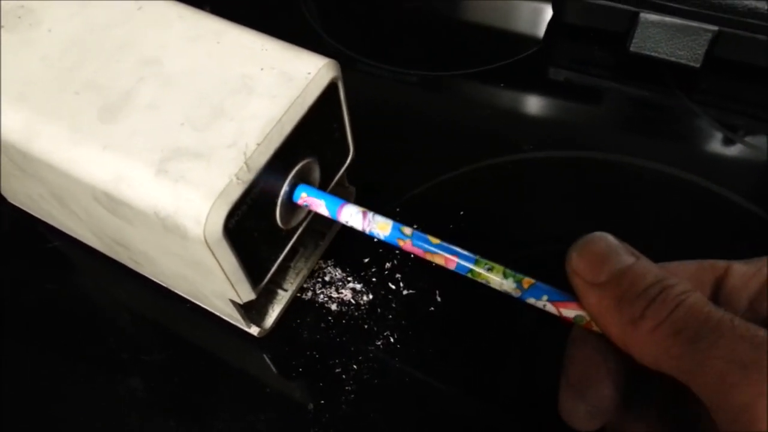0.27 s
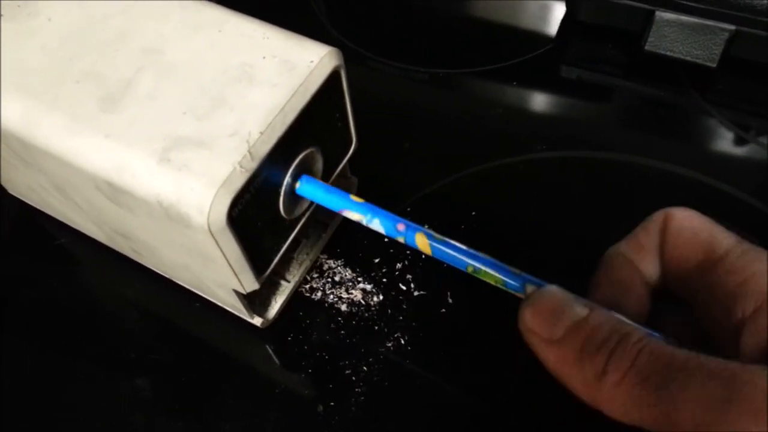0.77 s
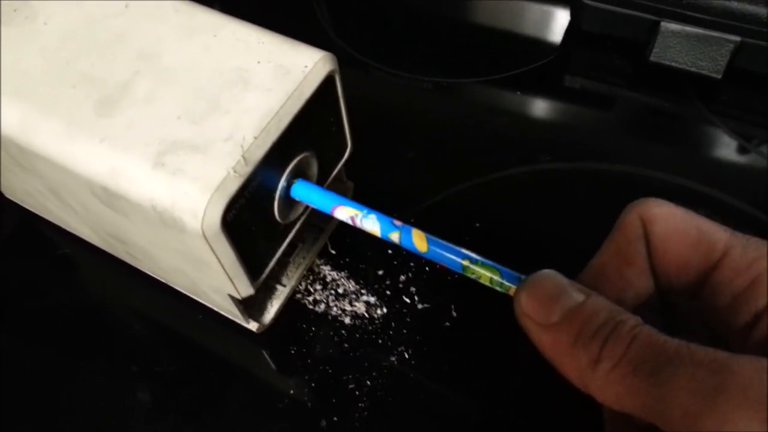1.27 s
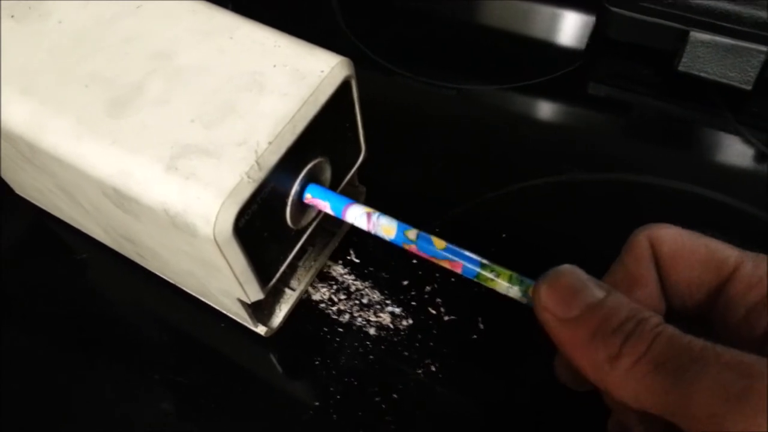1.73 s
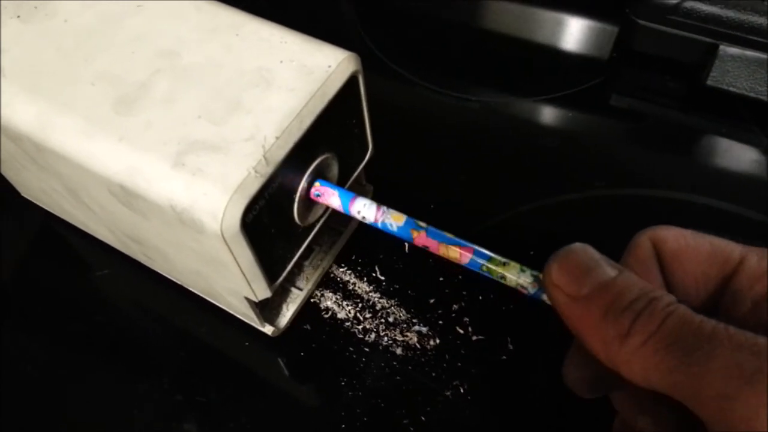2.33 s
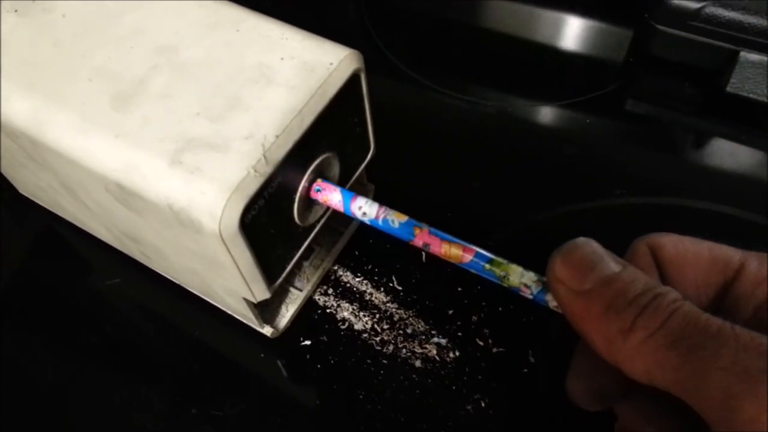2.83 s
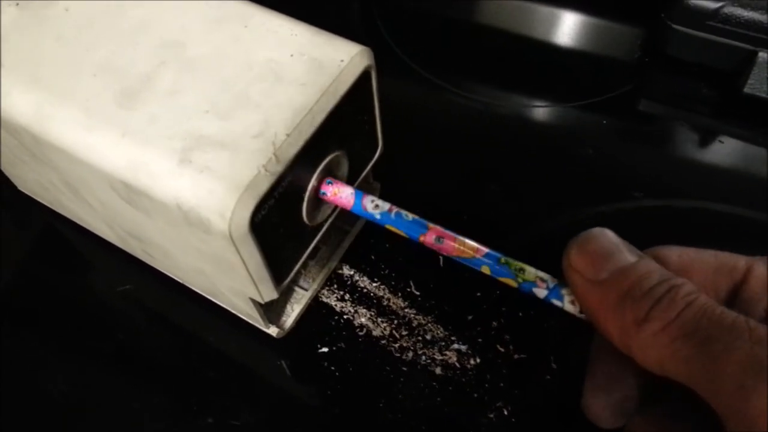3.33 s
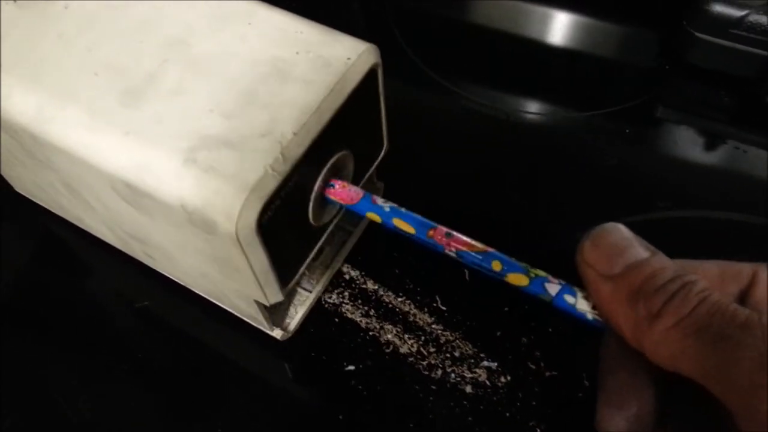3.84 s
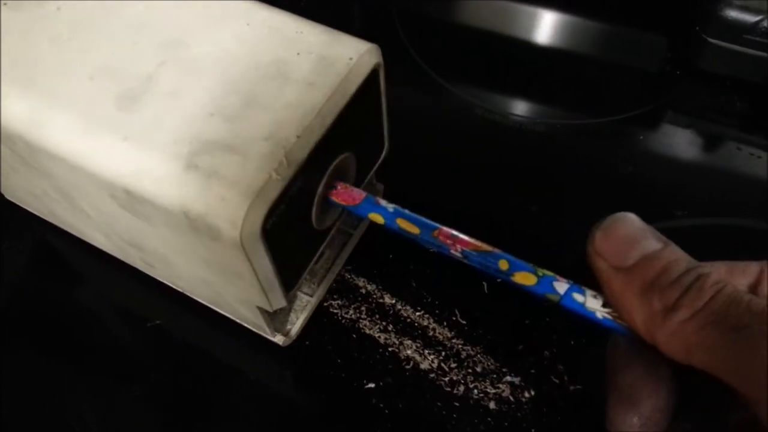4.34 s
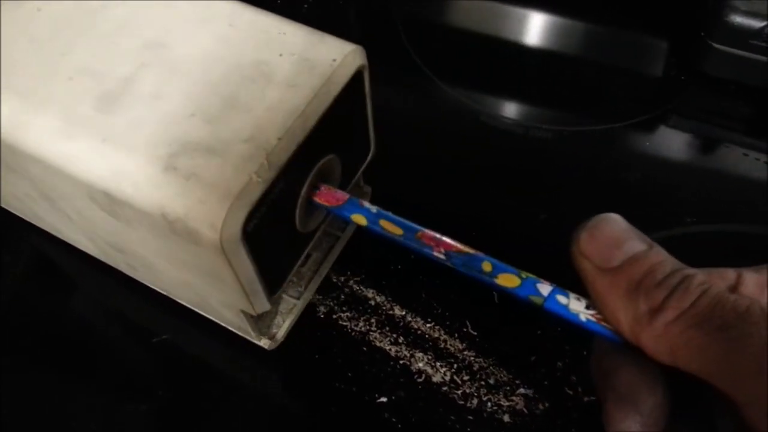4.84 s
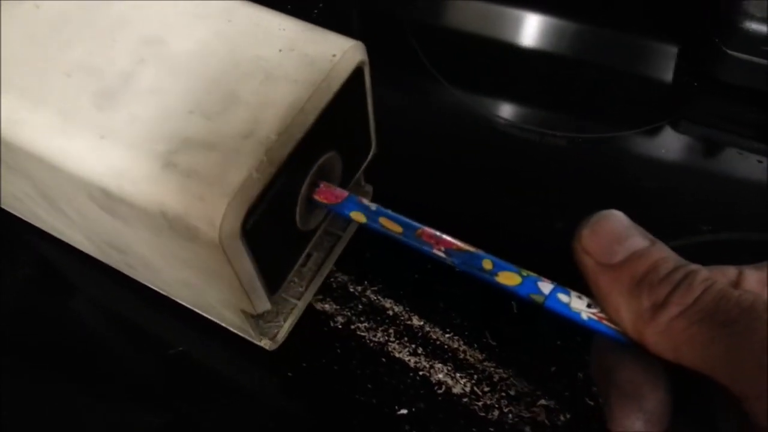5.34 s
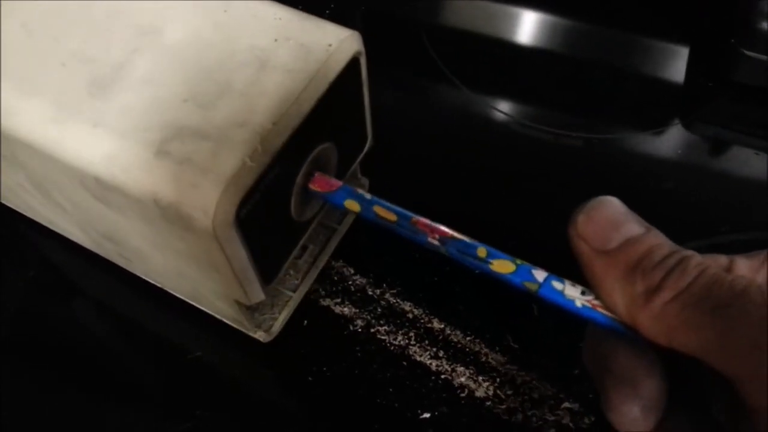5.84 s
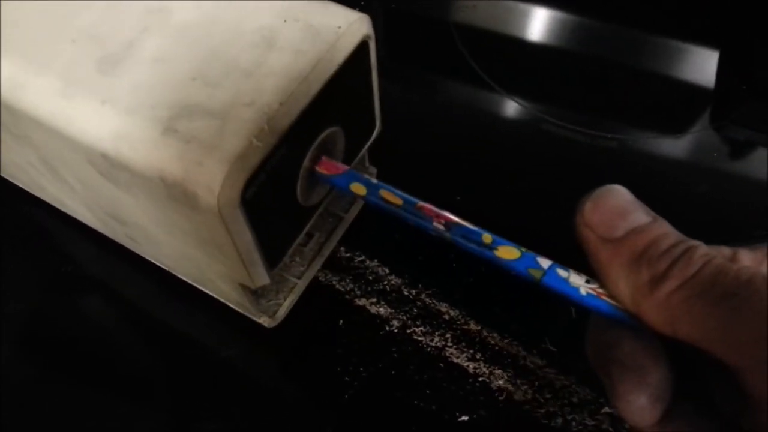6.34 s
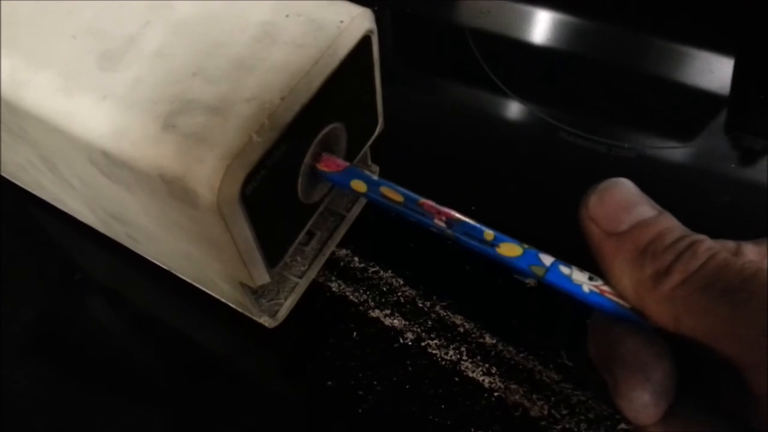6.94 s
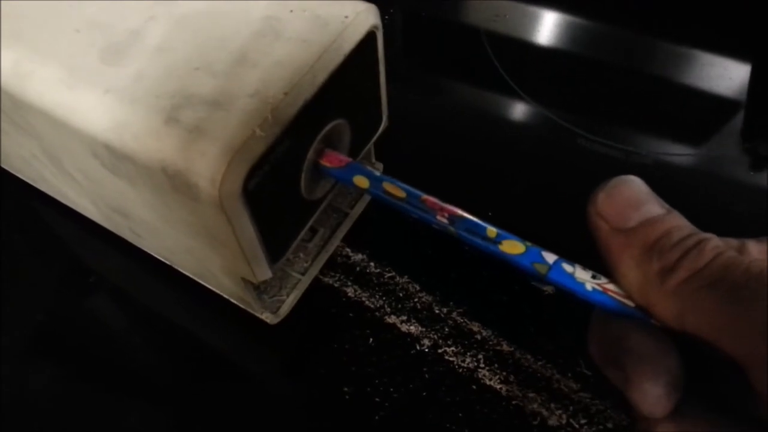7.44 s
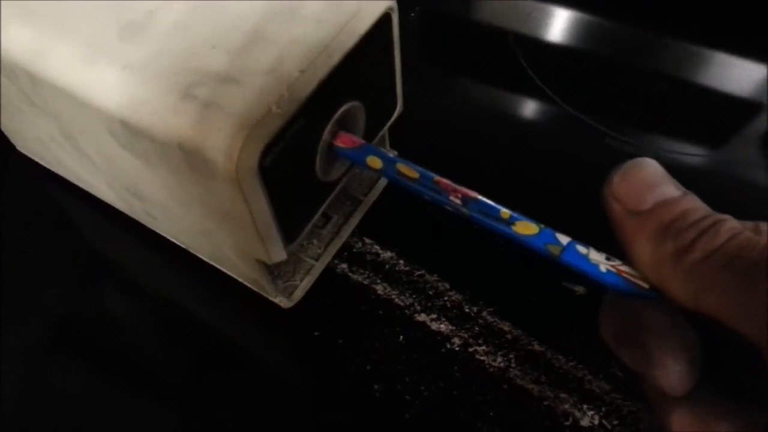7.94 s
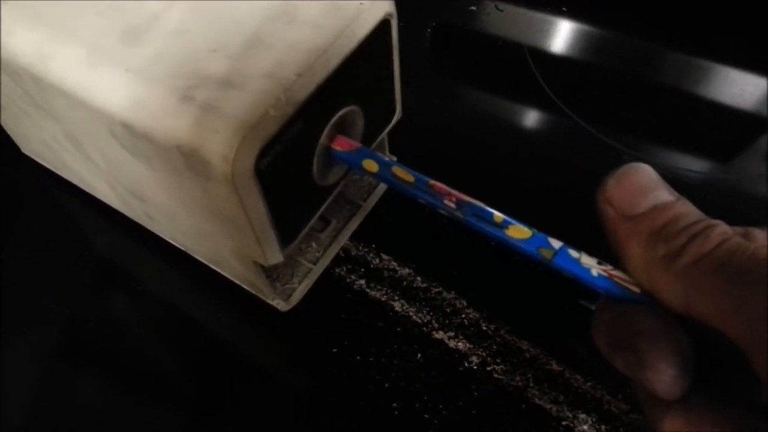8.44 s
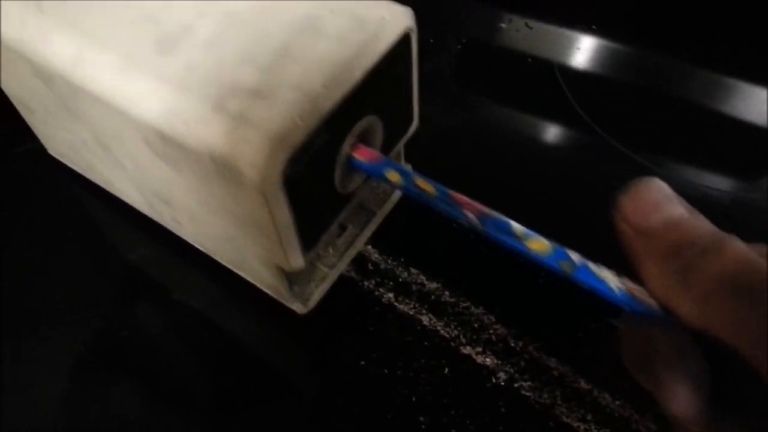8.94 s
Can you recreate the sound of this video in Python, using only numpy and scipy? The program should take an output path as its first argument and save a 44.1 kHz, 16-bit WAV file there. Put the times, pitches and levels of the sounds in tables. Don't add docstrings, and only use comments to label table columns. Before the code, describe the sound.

Close, harsh grinding of a pencil in a motorised sharpener: rattling plastic housing, fast rhythmic bright rasps, and slight squeaks as the point forms.

```python
import sys
import numpy as np
from scipy import signal
from scipy.io import wavfile
from scipy.ndimage import uniform_filter1d

SR = 44100
rng = np.random.default_rng(int(sys.argv[2]) if len(sys.argv) > 2 else 0)


def bounce(signal):
    frames = np.transpose(np.atleast_2d(signal))
    limited = np.clip(frames, -1, 1)
    pcm = np.round(limited * 32767).astype(np.int16)
    wavfile.write(sys.argv[1], SR, pcm)


def how_loud(loudness_db):
    steps = np.asarray(loudness_db, float) / 20
    return 10 ** steps


N = 405719

# t/s, bite strength/dB, motor load/dB, seating in the cone/0-1, rocking of the base/dB
HAND = [(0, 1, 2, 0.3, 6), (.5, 1.5, 0, 0.2, 2), (1., -1, 0, 0.15, 0), (1.601, 1, 0, 0.18, 3),
        (2.3, -0.5, 0, 0.32, 2), (3., 0, 0, 0.18, 4.5), (3.6, 0, .5, 0.6, 6.5), (4.1, -1.5, 0, 0.75, -4),
        (4.7, -3, -1, 0.62, 3), (5.298, -0.5, 0.5, 0.44, 6), (6., -0.5, -0.5, .6, -1),
        (6.8, -2.5, -1, 0.7, 3), (7.4, 1, 0, 0.7, -3), (8., -0.5, -0.5, .7, -3), (8.4, 0.5, 0, 1, -4),
        (9.07, 2, -1.5, 0.96, -14), (9.13, -2, -10, 0.9, -10), (9.2, -2, 2, 1.2, -11.5)]


def housing(bites, base_db, low_db, shell_db, lid_db, steady_db):
    # f/Hz, width/Hz, left level/dB, right level/dB
    base_modes = [(158.5, 37, -3.5, -3), (342, 32, 1, 3.5), (415, 39, 3, -7.5)]
    hum_modes = [(270.8, 22.3, -5.5, -4.5), (300.6, 45.6, -19, -14)]
    low_modes = [(542.8, 36, -5, 1), (601.6, 34, -8.5, -6.5)]
    shell_modes = [(679, 57, -9, -11), (769.7, 44.5, -5.5, -2), (858.4, 40, -10.5, -1.5)]
    lid_modes = [(932, 203, 2, -9), (1041.4, 83, 3.5, 6), (1077.6, 34, -6, -18.5)]
    upper_modes = [(1074, 170, -1.5, -15), (1257, 82, -23, 5.5), (1412, 82, 2, 4), (1571, 97, -12.5, 5.5),
                   (1774, 73, 3.5, -2), (1800, 100, -18, -9)]
    # place/turns, peak level/dB, brightness/dB, scatter/dB
    knock_turn = [
        (.03, -10, 0, 4.5),
        (.33, -9.5, 0, 2.5),
        (.68, -17, 0, 2.4),
    ]
    # place/turns, peak level/dB, brightness/dB, scatter/dB
    throb_turn = [
        (.12, -29.5, 0, 5.1),
        (.42, -25, 0, 4.),
        (.7, -24, 0, 3.6),
    ]
    # t/s, peak level/dB
    loud_knocks = [(.087, -6.5), (.222, -3), (.357, -5), (0.473, 1), (.552, -3), (0.63, -5), (0.806, 2.5),
                   (1.167, -2), (1.42, 1), (1.543, 7), (1.932, 1), (2.246, -8), (2.831, -5.5),
                   (3.214, -0.5), (4.283, -5), (4.482, -10), (4.735, -2), (4.962, -12), (5.098, -1),
                   (5.505, -5), (5.979, -7), (6.507, -3), (7.273, 1), (7.698, -3.5), (8.023, -2),
                   (8.322, 0.5), (8.453, -0.5), (8.697, 4), (8.869, -12), (9.101, 5)]
    # t/s, peak level/dB
    strong_throbs = [(.193, -19), (.331, -18), (.472, -21), (.609, -17), (.805, -23), (1.168, -20),
                     (1.602, -17), (1.766, -27), (2.054, -24), (2.21, -19), (2.304, -20), (2.427, -18),
                     (2.602, -17), (3.091, -13), (3.218, -19), (3.909, -22), (4.25, -22), (4.378, -19),
                     (4.512, -15), (4.64, -17), (4.862, -15.5), (4.984, -18), (5.259, -21.5), (5.596, -22),
                     (5.755, -20), (6.775, -17), (7.518, -19), (7.76, -26), (7.902, -22), (8.028, -14)]

    knocks = np.vstack([contacts(knock_turn, np.zeros_like)[:, :2], loud_knocks])
    throbs = np.vstack([contacts(throb_turn, np.zeros_like)[:, :2], strong_throbs])
    knock = bursts(knocks, knocks[:, 1] + 7.48, attack_s=0.0016, decay_s=0.023)
    throb = bursts(throbs, throbs[:, 1] + 0.52, attack_s=0.0076, decay_s=0.019)
    jolt = bursts(bites, bites[:, 1] - 1.5, attack_s=0.0012, decay_s=0.017)

    gears = chatter(per_s=2500, spread_db=3.5)
    feet = chatter(per_s=900, spread_db=3.0)
    teeth = chatter(per_s=4000, spread_db=5.0)
    base_power = how_loud(2 * -35.) * (1 + 0.53 * knock)
    hum_power = how_loud(2 * base_db - 6) + throb
    low_power = how_loud(2 * low_db + 1.5) * (1 + 0.93 * knock)
    shell_power = how_loud(2 * shell_db - 3) * (1 + 1.8 * knock)
    lid_power = how_loud(2 * lid_db + 4.5) * (1 + 0.47 * knock)
    upper_power = how_loud(2 * steady_db + 24) * (1 + 0.12 * knock) + jolt

    base = body(base_modes, feet, base_power, flicker_db=2.4, even=0.05)
    hum = body(hum_modes, feet, hum_power, flicker_db=1.5, even=0.5)
    low = body(low_modes, gears, low_power, flicker_db=5.1, even=0.44)
    shell = body(shell_modes, gears, shell_power, flicker_db=2.1, even=0.38)
    lid = body(lid_modes, gears, lid_power, flicker_db=2.9, even=0.053)
    upper = body(upper_modes, teeth, upper_power, flicker_db=1.44, even=0.24)

    free = bursts(bites - [0.016, 0, 0], bites[:, 1] + 14, attack_s=0.004, decay_s=0.01)
    return base + hum + (low + shell + lid + upper) / np.sqrt(1 + 0.5 * np.minimum(free, 1.5))


def cutter_bites():
    # place/turns, peak level/dB, brightness/dB, scatter/dB
    bite_turn = [
        (0, -7, -8.5, 1.07),
        (.3, -24.5, -17, -1),
        (.55, -23, -14, 5),
        (.72, -14, -10, 1.5),
    ]
    # t/s, change of level/dB
    odd_turns = [(.2, 2.5), (.68, -2.5), (.8, 6), (.93, -3), (1.17, 5), (1.42, 2), (1.54, 5), (1.79, -4),
                 (1.92, 3.5), (2.29, -8), (3.05, 5), (3.55, 1), (4.05, -2), (4.3, 3.5), (4.43, -1.5),
                 (5.06, 1), (5.18, -1.5), (5.44, -7), (5.57, 0.5), (5.69, -5), (5.82, -1.5), (5.94, 0),
                 (6.19, 1.5), (6.94, -0.5), (7.19, 3), (7.7, 2.5), (8.2, -1), (8.33, 4.5), (8.45, 4.5),
                 (8.7, 3.5)]
    # t/s, peak level/dB, brightness/dB
    catches = [(.52, -25, -11), (1.0904, -20, 4), (1.39, -13, -9), (1.73, -26, -7), (2.134, -13.5, -4),
               (2.393, -13, -14), (2.773, -5.5, -14), (3.7614, -13, -11), (4.014, -13.5, -4),
               (4.15, -10.5, -16), (5.158, -9, -7), (5.4031, -10, -7), (5.9249, -15, -12),
               (6.286, -9.5, -6), (6.6473, -16, -8), (6.774, -14, -4), (6.9177, -17, -5), (6.98, -17, -11),
               (7.1372, -10, -7), (7.2759, -15, -13), (7.5188, -13, -12), (7.9004, -8.5, -10),
               (8.027, -8, -8), (8.297, -10, -12), (8.3614, -17, -4), (8.6647, -21, -3), (8.9755, -4.5, -7),
               (9.0284, -10, -10), (9.0976, -10, 1)]
    hand_s, bite_db = np.transpose(HAND)[:2]
    odd_s, odd_db = np.transpose(odd_turns)

    def strength_db(at):
        near = np.abs(at[..., None] - odd_s) < 0.02
        return np.interp(at, hand_s, bite_db) + np.sum(odd_db * near, axis=-1)

    return np.vstack([contacts(bite_turn, strength_db), catches])


def rasp(bites, steady_db):
    # f/Hz, left level/dB per Hz, right level/dB per Hz
    colours = [(1664, 6, 16.5), (2037, -0.5, -3), (2880, -5.5, -9), (3630, -2, -18), (4120, -3, -14),
               (4720, -8, -12.5), (6080, -14.5, -11), (6440, -19, -20.5), (7940, -12, -13),
               (10350, -24, -8), (12250, -17, -9.5), (13100, -25.5, -14), (14300, -18, -16)]
    # f/Hz, width/Hz, left level/dB, right level/dB
    cutter_modes = [(2677, 74, 1.5, -9), (3490, 145, -1, -7.5), (4250, 500, -14, -8.5),
                    (5900, 82, -5.5, -27), (7160, 940, -27, -8)]
    # f/Hz, width/Hz, left level/dB, right level/dB
    blunt_modes = [(2915, 22, -7, -7), (4310, 31, -2, 4), (5170, 60, -11, -11), (6700, 68, 2, -12),
                   (10140, 400, -13, -2.5), (10370, 150, -6, -8)]
    pointed_modes = [(2710, 33, 8, -6), (4010, 58, 3, -2), (5980, 55, 0, -3), (7720, 190, -23, -8)]

    peak_db, bright_db = bites[:, 1:].T
    dull = bursts(bites, peak_db - 9.5, attack_s=0.003, decay_s=0.021)
    bright = bursts(bites, peak_db + bright_db - 0.5, attack_s=0.003, decay_s=0.021)
    chips = [chatter(per_s=11000, spread_db=6.0), chatter(per_s=9000, spread_db=3.5)]
    steady = how_loud(2 * steady_db + 6.5) * flicker(spread_db=1.5, rate=43)

    edges = np.geomspace(1700, 14800, 14)
    out = 0
    for k, (low, high) in enumerate(zip(edges, edges[1:])):
        hz = np.sqrt(low * high)
        octaves = np.log2(hz / 4500)
        dull_share = np.clip(1 - octaves, 0, 1)
        bright_share = np.clip(octaves, 0, 1) * np.clip(5700.0 / hz, 0, 1)
        power = steady + dull_share * dull + bright_share * bright
        gain = np.sqrt(power) * flicker(spread_db=1.5, rate=38)
        colour = how_loud(np.array([[at_hz(colours, hz)], [at_hz(colours, hz, column=2)]]))
        band = signal.butter(2, [low, high], "band", fs=SR, output="sos")
        out = out + colour * signal.sosfilt(band, gain * at_ports(chips[k % 2], hz))

    ringing = body(cutter_modes, chips[0], steady + 2 * dull, flicker_db=4, even=0)
    point = np.interp(np.arange(N) / SR, [4, 7], [0, 1])
    blunt = body(blunt_modes, chips[1], (steady + 2.2 * dull) * (1 - point), flicker_db=3.0, even=0)
    pointed = body(pointed_modes, chips[1], (steady + 3.3 * dull) * point, flicker_db=5.0, even=0)
    return how_loud(11.0) * out + how_loud(-12) * ringing + how_loud(-16) * blunt + how_loud(-13) * pointed


def tray(x):
    tray_db, t60_s, creep_s = -5.5, 0.045, 0.5
    t = np.arange(2000) / SR
    step = int(creep_s * SR)
    out = np.zeros((2, N + SR * 4))
    fade = np.sqrt(np.hanning(2 * step))
    padded = np.pad(x, [(0, 0), (step, 2 * step)])
    for start in range(0, N + step, step):
        echoes = rng.standard_normal((2, len(t))) * how_loud(-60 * t / t60_s) * (t > 0.0015)
        echoes = how_loud(tray_db) * echoes / np.sqrt(np.sum(echoes ** 2, axis=1, keepdims=True))
        piece = signal.fftconvolve(padded[:, start:start + 2 * step] * fade, echoes, axes=1)
        out[:, start:start + piece.shape[1]] += piece
    return (x + out[:, step:step + N]) / np.sqrt(1 + how_loud(2 * tray_db))


def lull():
    lead_s, depth, shudder_db = 0.016, 0.97, 1
    rows = contacts([(0.015, 3.9, 0, 3.3)], np.zeros_like)
    free = bursts(rows - [lead_s, 0, 0], rows[:, 1], attack_s=0.0046, decay_s=0.011)
    return flicker(shudder_db, rate=16.4) / np.sqrt(1 + depth * np.minimum(free, 2.5))


def rumble():
    low = signal.butter(2, [18, 110], "band", fs=SR, output="sos")
    shake = signal.sosfilt(low, rng.standard_normal((2, N)) * flicker(spread_db=6, rate=9))
    return how_loud(-68 + np.array([[0.3], [5.0]])) * rms_one(shake)


def contacts(pattern, strength_db):
    # t/s, count/turns
    carrier = [(-.054, -1), (.071, 0), (.557, 4), (1.1717, 9), (1.5439, 12), (2.169, 17), (3.0485, 24),
               (3.675, 29), (4.3026, 34), (5.0615, 40), (5.566, 44), (6.1914, 49), (7.193, 57), (7.699, 61),
               (8.4502, 67), (8.944, 71), (9.178, 73), (9.3, 74)]
    jitter_s = 0.0027
    s, turns = np.transpose(carrier)
    place, peak_db, bright_db, scatter_db = np.transpose(pattern)
    whole = np.arange(-1, turns[-1])[:, None]
    luck = rng.standard_normal((3, len(whole), len(place)))
    at = np.interp(whole + place, turns, s) + jitter_s * luck[0] * np.sqrt(scatter_db / 3)
    peaks = peak_db + strength_db(at) + scatter_db * luck[1]
    brights = bright_db + scatter_db * luck[2]
    rows = np.stack([at, peaks, brights], axis=-1).reshape(-1, 3)
    return rows[(at.ravel() > 0) & (at.ravel() < N / SR)]


def bursts(events, level_db, attack_s, decay_s):
    marks = np.full(N, 1e-18)
    start = np.array(events)[:, 0] - attack_s
    marks[np.maximum(start * SR, 0).astype(int)] = how_loud(2 * level_db)
    rise = np.exp(-1 / (attack_s * SR))
    fall = np.exp(-2 / (decay_s * SR))
    swell = signal.lfilter([(1 - rise) ** 2], [1, -2 * rise, rise * rise], marks)
    return signal.lfilter([1], [1, -fall], swell)


def chatter(per_s, spread_db):
    count = round(3 * per_s * N / SR)
    size_draw, sign_draw, time_draw = rng.random((3, count))
    sizes = how_loud(spread_db * np.minimum(-np.log(size_draw + 1e-9), 4)) * np.sign(sign_draw - 0.5)
    trains = np.zeros(3 * N)
    trains[(time_draw * 3 * N).astype(int)] = sizes
    return rms_one(trains.reshape(3, N) + 1e-18)


def body(modes, trains, power, flicker_db, even):
    out = 0
    for k, (hz, width_hz, *level_db) in enumerate(modes):
        drive = at_ports(trains, hz) * flicker(flicker_db, rate=21)
        rung = resonate(resonate(drive, hz, width_hz), hz, 2.87 * width_hz)
        out = out + (-1) ** k * how_loud(np.array(level_db))[:, None] * rung
    swell = uniform_filter1d(uniform_filter1d(np.mean(out ** 2, axis=0), size=400), size=400)
    evened = out * (np.abs(swell) + 1e-12) ** (-even / 2)
    return rms_one(evened) * np.sqrt(power)


def resonate(x, hz, width_hz):
    r = np.exp(-np.pi * width_hz / SR)
    poles = [1, -2 * r * np.cos(2 * np.pi * hz / SR), r * r]
    return signal.lfilter([(1 - r * r) / 2, 0, (r * r - 1) / 2], poles, x)


def at_ports(trains, hz):
    # f/Hz, share/0-1
    likeness = [(130, .92), (300, .96), (700, .94), (1200, .82), (2200, .5), (4500, .35), (8000, .2),
                (12000, .3)]
    alike = np.clip(at_hz(likeness, hz), 0, 0.99)
    return np.sqrt(alike) * trains[0] + np.sqrt(1 - alike) * trains[1:]


def left_later(pair, lag):
    return np.array([np.roll(pair[0], lag), pair[1]])


def flicker(spread_db, rate):
    r = np.exp(-80 * np.pi * rate / SR)
    noise = rng.standard_normal(N // 40 + 2002)
    slow = signal.lfilter([1], [1, -2 * r, r * r], noise)[2000:]
    return np.interp(np.arange(N) / 40, np.arange(len(slow)), how_loud(spread_db * rms_one(slow)))


def at_hz(points, hz, column=1):
    rows = np.array(points)
    return np.interp(np.log(hz), np.log(rows[:, 0]), rows[:, column])


def rms_one(x):
    return x / np.sqrt(np.mean(x ** 2) + 1e-20)


def scene():
    s, *hand = np.transpose(HAND)
    _, load_db, seating, rocking_db = [np.interp(np.arange(N) / SR, s, column) for column in hand]

    def level(mean_db, seated_db):
        return mean_db + load_db + seated_db * seating

    hum, low = level(-31, -1.5), level(-22, 4)
    shell, lid = level(-13, -4.5), level(-21.5, 4.5)
    steady = level(-30, 0.5)
    bites = cutter_bites()
    shaking = housing(bites, hum + rocking_db, low, shell, lid, steady)
    biting = tray(rasp(bites, steady))
    machine = left_later(shaking, lag=8) + left_later(biting, lag=5)
    return how_loud(0.8) * lull() * machine + rumble()


def thin_treble(x, keep_db, top_hz, top_db_per_khz, whim_db):
    hz, _, frames = signal.stft(x, SR, nperseg=2048)
    power = uniform_filter1d(np.abs(frames) ** 2, size=5, axis=1)[:, 2::5]
    level_db = 10 * np.log10(power + 1e-20)
    centre = hz[2::5, None]
    needed_db = keep_db + top_db_per_khz * np.maximum(centre - top_hz, 0) / 1000
    whim = np.sqrt(3) * uniform_filter1d(rng.standard_normal(level_db.shape), size=3, axis=2)
    kept = (level_db > needed_db + whim_db * whim) | (centre < 2000)
    return signal.istft(frames * np.repeat(kept, 5, axis=1), SR, nperseg=2048)[1][:, :N]


def low_pass(x):
    return signal.sosfilt(signal.butter(12, 14540, fs=SR, output="sos"), x)


def record(dry):
    over_db = np.maximum(20 * np.log10(np.abs(dry).max(axis=0) + 1e-9) + 0.075, 0)
    ramp = 150 * np.arange(N) / SR
    held = np.maximum.accumulate(over_db + ramp) - ramp
    duck = how_loud(-0.6 * signal.lfilter([0.02], [1, -0.98], held))
    left, right = np.clip(dry * duck, -0.97, 0.97)
    right = signal.sosfilt(signal.butter(6, 12300, fs=SR, output="sos"), right)
    ports = np.array([left, right])
    mix = thin_treble(ports, keep_db=-67.5, top_hz=11300, top_db_per_khz=1.7, whim_db=4.5)
    return low_pass(mix)


dry = scene()
out = record(dry)
bounce(out)
```